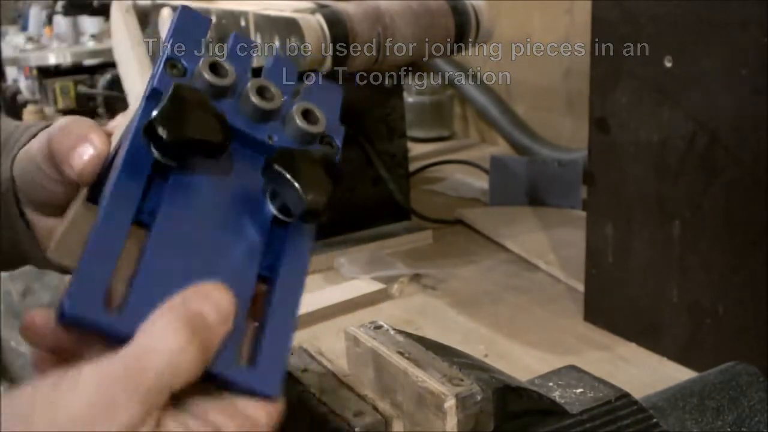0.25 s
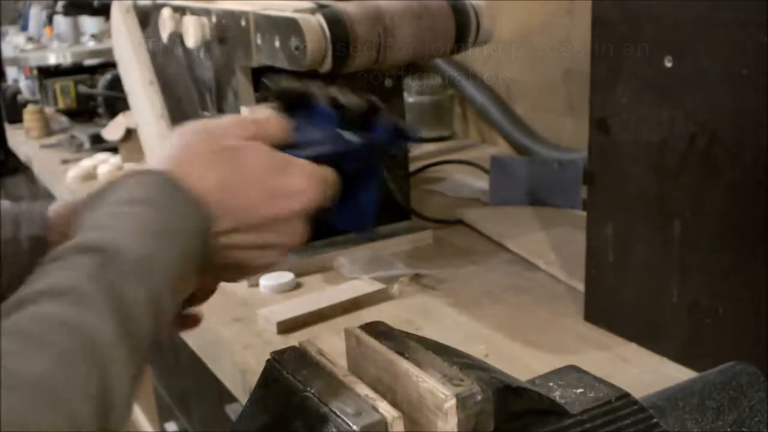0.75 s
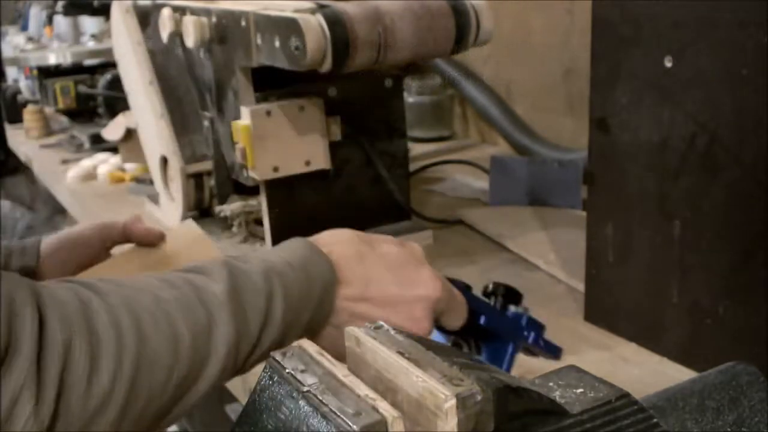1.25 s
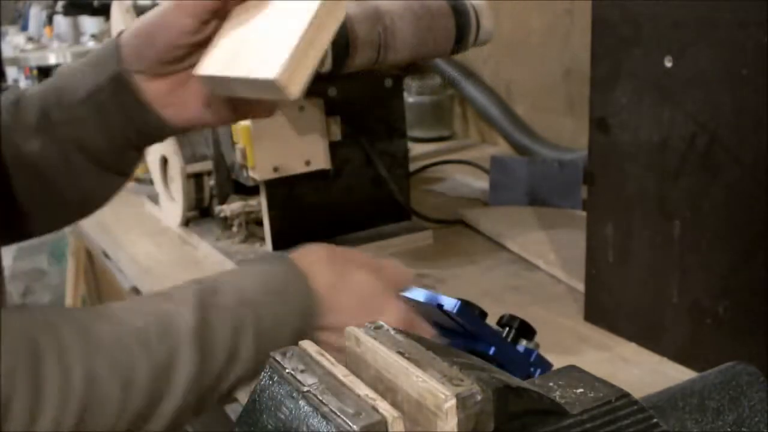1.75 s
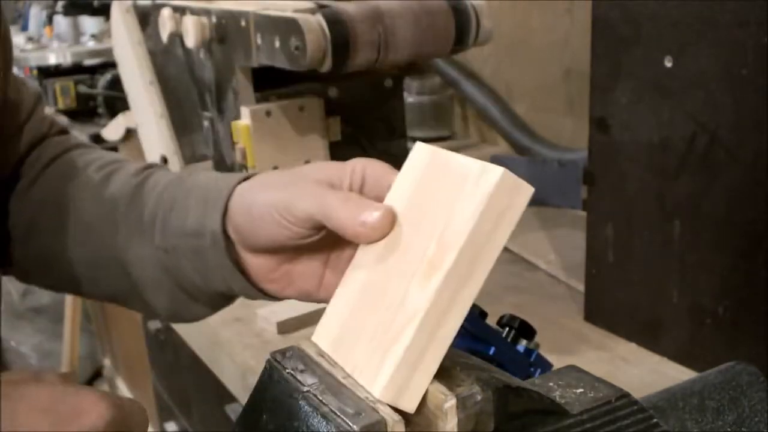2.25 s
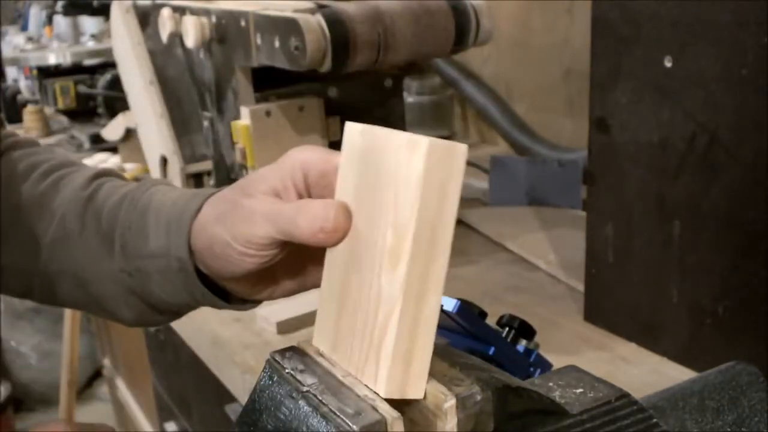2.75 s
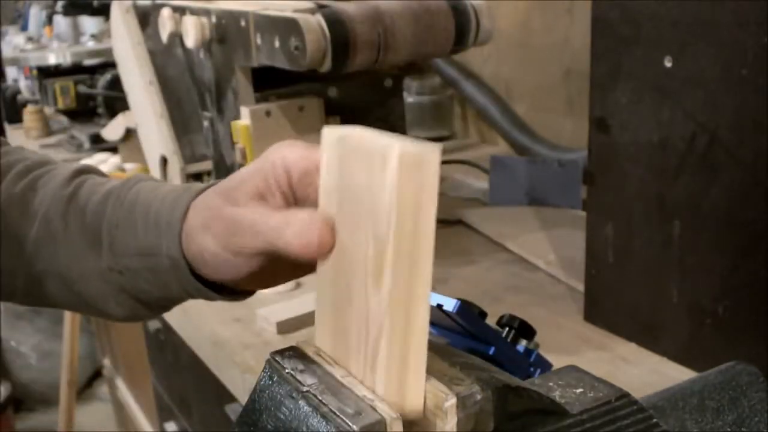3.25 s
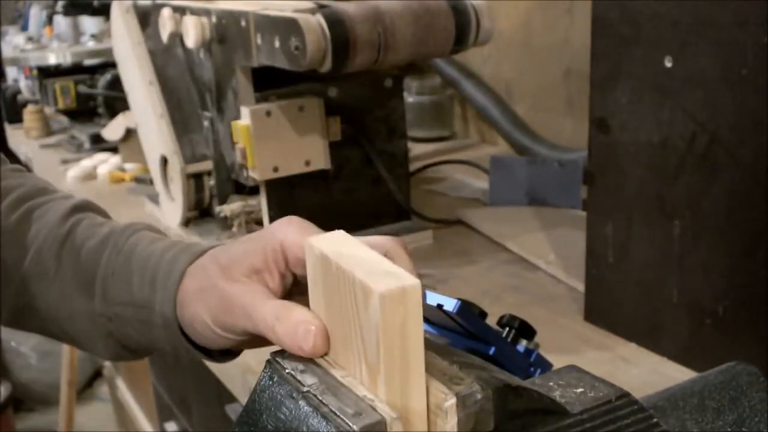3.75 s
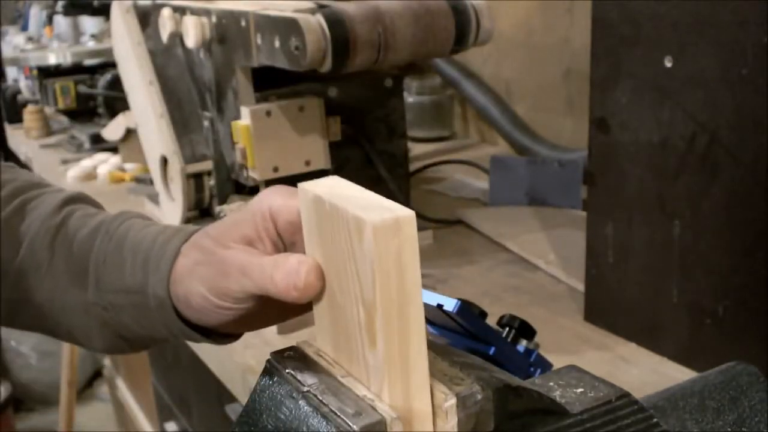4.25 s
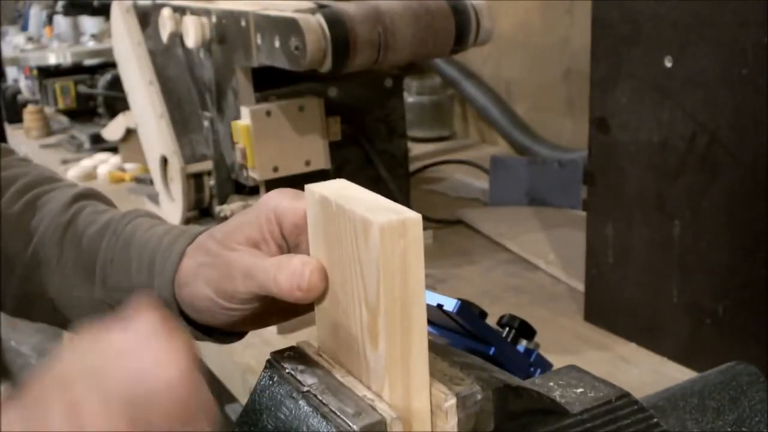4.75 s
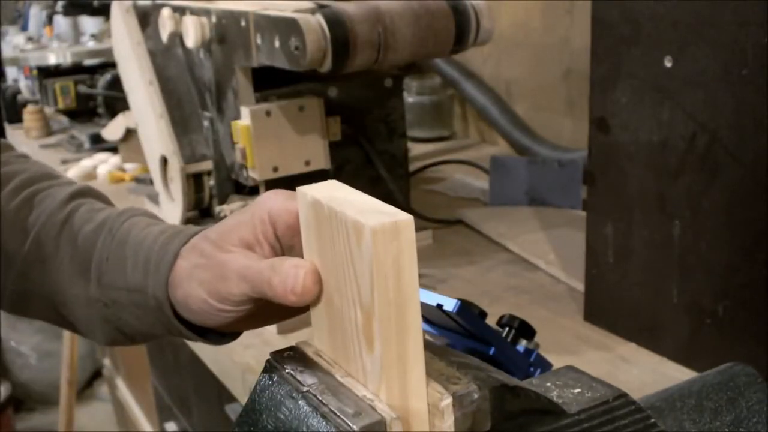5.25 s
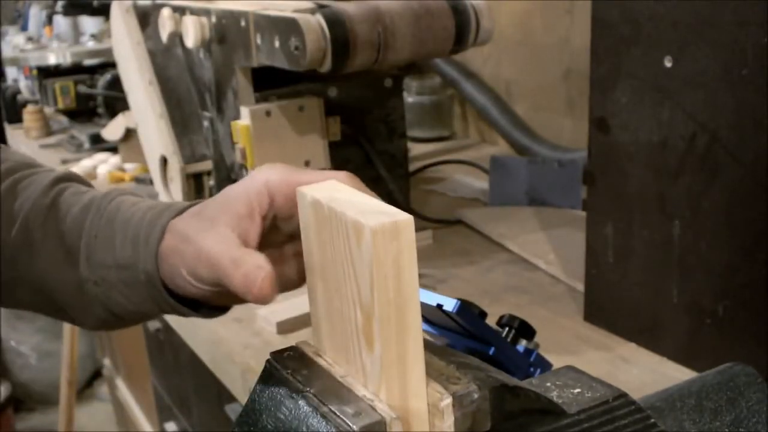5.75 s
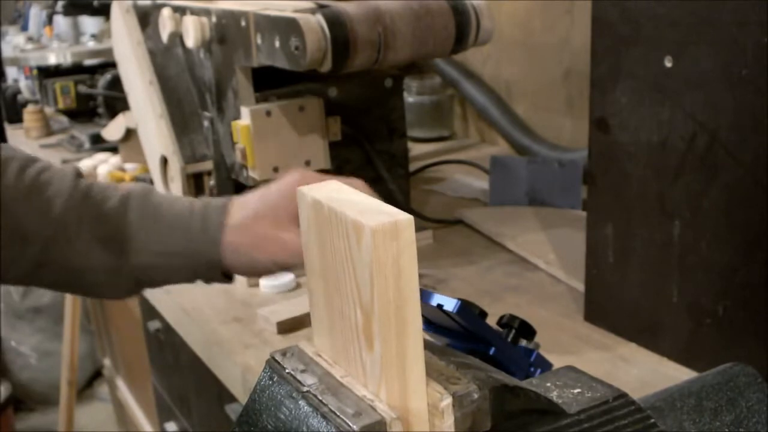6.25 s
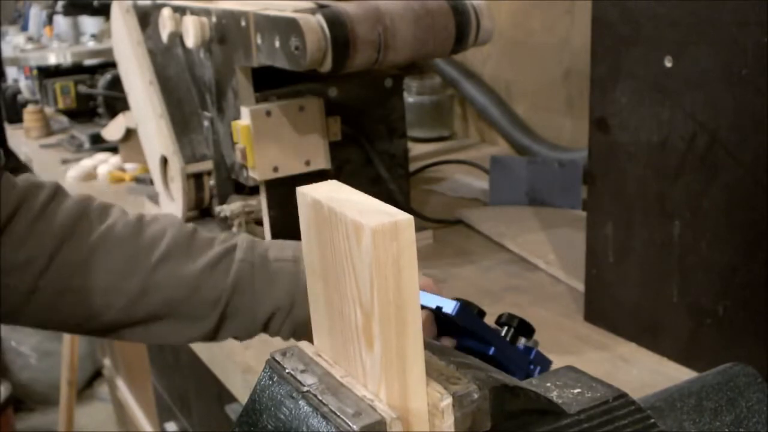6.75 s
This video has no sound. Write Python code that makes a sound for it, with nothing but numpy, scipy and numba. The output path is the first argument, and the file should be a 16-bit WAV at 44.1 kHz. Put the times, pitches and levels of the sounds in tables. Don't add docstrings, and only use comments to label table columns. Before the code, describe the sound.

In a small quiet workshop, a metal jig knocks onto a wooden bench, a pine block taps into a vise, and iron parts clank sharply.

```python
import sys
import numpy as np
from scipy import signal
from scipy.fft import rfft, irfft
from scipy.io import wavfile
from scipy.ndimage import uniform_filter1d
from numba import njit

SR = 44100
rng = np.random.default_rng(int(sys.argv[2]) if len(sys.argv) > 2 else 0)


def volts_from_decibels(level):
    exponent = np.asarray(level, float) / 20
    return 10 ** exponent


def put_to_file(sound):
    columns = np.atleast_2d(sound).T
    safe = np.clip(columns, -1, 1)
    whole_steps = np.round(safe * 32767)
    wavfile.write(sys.argv[1], SR, whole_steps.astype(np.int16))


N = 308700
SPAN = 2 ** 15

# start_s, peak_db, bass_re_peak_db, treble_re_peak_db
BENCH_BLOWS = [
    (1.5405, -21, -13, -27.5),
    (1.571, -7, -31, -32.5),
    (1.5865, -10, -29, -58),
    (1.6, -18, -33, -37),
    (1.62, -23, -21, -24),
    (1.659, -18, -21, -60),
    (1.689, -25.5, -29.5, -52),
    (2.2005, -27.5, -22, -19),
]
BLOCK_BLOWS = [
    (2.57, -40, -9, -11),
    (2.623, -43, 4, 34),
    (3.201, -35.5, -11, -22),
    (4.342, -46, 2, -26),
    (4.709, -50, 0, -17),
    (6.668, -53, 5, -12),
    (6.707, -54, 6, -13),
    (6.784, -37, -3, -3),
]
LIFT_BLOWS = [
    (2.212, -26, -1, 7),
    (2.2175, -21.5, -1, 4),
    (2.227, -29, -11, -11),
    (2.241, -33, -2, -12),
]
EDGE_BLOWS = [
    (3.0595, -25, 9, 0),
    (3.179, -34, 2, -4),
    (3.845, -31.5, -6, 7.5),
]
JAW_BLOWS = [(3.2705, -21, -46, -5.5), (3.297, -23, -24, 6), (3.308, -24.5, -19.5, -7),
             (3.539, -39, -31, 5), (3.563, -21, -51, 7), (3.688, -37, -37, 2), (3.719, -28.5, -30, -9),
             (4.1675, -33.5, -24, -12), (4.218, -38.5, -40, 6), (5.079, -28, -18, -4),
             (6.772, -36.5, -14, -13), (6.79, -35, -21, -10)]
NUT_BLOWS = [
    (5.28, -26, -28, -11),
    (5.3135, -11.5, -26, -2.5),
    (5.494, -29.5, -14.5, -10.5),
]
STOP_BLOWS = [
    (6.3085, -8, 1, 7),
    (6.313, -14.5, -13.5, -7.5),
    (6.319, -15, -33, -19),
]
# start_s, peak_db
THUMPS = [
    (1.414, -33),
    (1.445, -36.5),
    (3.188, -42.5),
    (3.575, -40),
    (4.975, -37),
    (6.108, -31),
    (6.148, -34),
    (6.2, -52),
]
TICKS = [
    (1.458, -41.5),
    (1.513, -35),
    (2.051, -34.5),
    (3.0544, -27),
    (3.167, -36.5),
    (3.25, -28.5),
    (3.4655, -23),
    (6.8595, -32.5),
]
SCREW_BLOWS = [
    (4.966, -9),
]
HANDLE_BLOWS = [
    (6.103, -8),
    (6.1065, -13.5),
]
REBOUNDS = [
    (6.357, -17),
    (6.362, -19),
    (6.369, -17),
    (6.382, -34),
]
PINGS = [
    (6.322, -35.5),
]

# pitch_hz, level_db, t60_s (as heard in the room)
BENCH_MODES = [(324, 11, 0.8), (440, 8.5, 0.16), (554, 5.5, 0.5), (665, 5, 0.8), (837, -3.5, 0.33),
               (1177, -11, 0.45)]
BLOCK_MODES = [(840, 36, 0.024), (970, -20, 0.16), (1003, -8, 0.4), (1930, -3, 0.23), (2740, -21, 0.25)]
LIFT_MODES = [(400, -13, 0.12), (862, -3, 0.18), (1000, -4.5, 0.19), (1215, -3, 0.25), (1760, -5, .28),
              (2210, -3, 0.15), (2800, -11.5, 0.22)]
EDGE_MODES = [(444, -5, 0.21), (900, 5, 0.2), (1390, 0, 0.24), (1980, -11, .2), (2585, -5.5, 0.29),
              (3210, -4, .15)]
JAW_MODES = [(285, -8, 0.27), (413, -11, 0.25), (943, -8, 0.22), (1429, 7.5, 0.25), (1558, 1.5, 0.34),
             (2556, -2, 0.2), (3340, -5, 0.12)]
SCREW_MODES = [(536, -10, 0.19), (690, -18, .3), (872, -9, 0.3), (1270, -11, .3), (1809, 0, 0.19),
               (2660, 9, 0.08), (2800, -18, 0.1), (3321, -10, 0.14), (3780, -0.5, 0.33), (4190, 0.5, 0.37)]
NUT_MODES = [(253, -18, 0.21), (405, -4.5, 0.25), (821, -9, 0.53), (1088, -5, 0.46), (1599, 1.5, 0.33),
             (1880, -19, 0.15), (2145, 3.5, 0.11), (2487, 2, 0.16), (2480, 4, 0.028), (2700, -3.5, 0.11),
             (3735, -4, 0.22)]
HANDLE_MODES = [(294.4, -7.5, 0.21), (426, -5, 0.24), (747, -5, 0.34), (1035, -8, 0.24), (1457, -14, 0.28),
                (1544, -2.5, 0.59), (1622, -1, 0.3), (2124, -21, 0.22), (2780, -3, 0.18), (3220, 2.5, 0.11),
                (4500, -23, .25)]
STOP_MODES = [(372, -4, 0.37), (958, 2.5, 0.29), (1190, 0.5, 0.41), (1500, -4, 0.24), (1690, 12.5, 0.2),
              (2180, -8, .12), (2755, -1, 0.24), (3700, -10, 0.37)]
WASHER_MODES = [(7200, 0, .16)]
SPLIT, SPLIT_HZ, PARTNER_DB = 0.027, 21, -5

# freq_hz, level_db (per Hz)
THUMP_CLACK = [(60, -4.5), (150, 4), (250, -6.5), (450, -20), (900, -48), (16000, -90)]
BENCH_CLACK = [(41, -54), (70, -26), (329, -1), (658, -8.5), (1020, -19.5), (1150, -18.5), (1350, -31),
               (1700, -21), (2690, -35.5), (8000, -66), (10400, -57), (17600, -120)]
BLOCK_CLACK = [(59, -39), (100, -47), (315, 14), (621, 2), (930, -14), (1580, -3.5), (2690, -16),
               (4980, -24), (5900, -25), (16000, -41)]
LIFT_CLACK = [(100, -35), (350, -14), (900, -5), (1800, 1.5), (2800, -7.5), (4500, -17.5), (8000, -24.5),
              (16000, -39)]
EDGE_CLACK = [(100, -37), (400, -3.5), (900, 7), (1500, -2), (2600, -8), (3500, -9.5), (4500, -32),
              (16000, -45)]
TICK_CLACK = [(180, -49), (300, -39), (2740, -2), (3520, 1.5), (5080, -7.5), (5800, -2.5), (13800, -10.5),
              (16000, -71)]
JAW_CLACK = [(59, -53), (100, -28), (381, -20), (1060, -9.5), (1230, -15), (1480, -5.5), (2040, -27),
             (2420, -11.5), (16000, -51.5)]
SCREW_CLACK = [(59, -47), (100, -28.5), (700, -10.5), (1900, -14.5), (2600, -1), (3300, -16), (4380, -7),
               (5300, -21.5), (7600, -18.5), (16000, -60)]
NUT_CLACK = [(80, -24), (350, -8), (700, -18.5), (1300, -12.5), (2000, -3.5), (2550, -8), (3100, -12.5),
             (7000, -25.5), (16000, -51)]
HANDLE_CLACK = [(41, -80), (70, -17), (441, -10), (1340, -9), (1510, -0.5), (1980, -4.5), (2500, -5),
                (3200, -1.5), (4500, -3.5), (9700, -16), (13600, -24), (16000, -50)]
STOP_CLACK = [(60, -41), (376, -13), (700, -10), (1200, -0.5), (1600, 1.5), (2300, 1.5), (3800, -5.5),
              (7400, -20), (11000, -41.5), (16000, -71)]
REBOUND_CLACK = [(59, -48), (100, 4), (1200, -7), (1350, -24), (1690, 1), (2800, -8), (7420, -40),
                 (12000, -36), (15600, -86), (22000, -120)]
# freq_hz, level_db
NEAR_TONE = [(150, -6), (900, 1)]

# loudest_s, swell_s, fade_s, hiss_db, pressure_db
FINGERS = [(0.484, 0.18, 0.02, -60, -13), (1.012, 0.25, 0.087, -83, 9), (1.31, 0.07, 0.08, -54.5, -26),
           (1.66, 0.13, 0.12, -60, 19), (1.874, 0.15, 0.054, -55.5, -6), (2.04, 0.091, 0.11, -54, -25),
           (2.496, .16, 0.095, -47, -18), (2.562, 0.024, .04, -71, -11), (2.634, 0.1, 0.039, -48, -8.5),
           (2.744, 0.11, 0.098, -58.5, -23), (3.03, 0.19, 0.025, -57, -7), (6.79, 0.066, 0.14, -59.5, 11),
           (.24, 1, 0.17, -59, -13)]
SLIDES = [(3.072, 0.0066, 0.073, -47.5, -4.5), (3.163, 0.0045, 0.082, -48.5, -28),
          (3.252, 0.017, 0.095, -41, -54), (3.311, 0.039, 0.0086, -43, 8.5),
          (3.43, 0.074, 0.094, -56.5, 0.5), (3.54, 0.055, 0.046, -43.5, -14.5),
          (3.565, 0.04, 0.018, -39, -16), (3.59, 0.02, 0.07, -55, -7), (3.69, 0.031, 0.083, -51, -12),
          (3.72, 0.033, 0.018, -40.5, -12.5), (3.93, 0.033, 0.37, -54.5, -54),
          (4.01, 0.11, 0.062, -47, -10), (4.1, 0.21, 0.23, -69, 6.5), (4.17, 0.092, 0.35, -62, 5),
          (4.448, 0.019, 0.053, -58.5, -21), (4.638, 0.077, 0.085, -70, -15),
          (4.716, 0.031, 0.18, -81.5, 23), (4.93, 0.17, 0.026, -60.5, -40)]
SLEEVE = [
    (.23, 0.11, 0.12, -59, -13),
    (.455, .05, 0.048, -60.5, -20),
    (1.28, 0.013, .14, -55, -22),
    (1.315, 0.067, 0.066, -69, -20),
    (1.67, 0.11, .06, -55, -20),
    (1.8, .06, 0.088, -58.5, -18),
    (2.06, .06, 0.062, -53.5, -28),
    (3.97, 0.071, 0.23, -55, -16),
]
STROKE_DB = 20
KNOCK_PER_PRESSURE = 0.23
# freq_hz, level_db (per Hz)
SKIN = [(710, -85), (1200, -25), (1830, -12), (2000, -21), (2380, -7), (3220, -10.5), (3510, -9.5),
        (4450, -4), (5130, -12), (13500, -24.5), (16000, -58)]
GRAIN = [(1180, -66), (2000, -52), (2220, -17), (2490, -7), (2910, -12), (3310, -2), (3940, -9),
         (7570, -15.5), (8630, -21.5), (12400, -22.5), (16000, -35)]
CLOTH = [(1500, -30), (3500, -25), (4700, 8), (6000, -4), (10000, -4), (14000, -4), (16000, -16)]
WOOD = [(350, -71), (600, -10), (1020, 4.5), (1100, 3.5), (1560, 9), (1790, 5), (2120, -2), (2460, -6),
        (2600, 2), (3380, -73), (5720, -120)]
RUMBLE = [(90, -6), (200, -2), (400, 11), (700, -5.5), (1000, -23.5)]

# freq_hz, t60_s
ROOM_T60 = [(100, 0.35), (300, 0.28), (1000, 0.34), (3000, 0.3), (8000, 0.29), (15000, 0.19)]
# freq_hz, side_re_mid_db
ROOM_SIDE = [(100, -27), (400, -15), (1000, -6), (3000, -3.5), (8000, 3.5)]
# freq_hz, level_db
ROOM_TONE = [(100, 3), (500, 8.5), (2000, 1), (6000, -6.5), (15000, -7.5)]
# freq_hz, lead_radians
PORT_PHASE = [(500, 0.15), (2000, 1.1), (4000, 1.54), (8000, 1.28), (16000, 1.54)]
# freq_hz, left_re_right_db
PORT_SHADE = [(100, 1.5), (500, 2.5), (1200, 0.5), (2500, -0.5), (5000, 2.5), (9000, 5), (14000, 8)]
# freq_hz, level_db (per Hz)
SHOP_MID = [(12, -81), (20, -13.5), (331, 1), (548, -1.5), (686, 2.5), (1140, -6), (2490, -7),
            (3120, -10.5), (5320, -13), (11000, -22.5), (15000, -23.5), (16400, -53)]
SHOP_SIDE = [(12, -47), (20, -13), (230, 0), (596, -0.5), (1170, -3.5), (1680, -3), (3300, -9.5),
             (4630, -8.5), (12700, -22), (15000, -22), (16400, -59)]
SHOP_MID_DB, SHOP_SIDE_DB = -56, -58


def on_log(table, hz):
    f, v = np.transpose(table)
    return np.interp(np.log(np.maximum(hz, 1)), np.log(f), v)


def colour(x, table):
    n = x.shape[-1]
    return irfft(rfft(x) * volts_from_decibels(on_log(table, np.fft.rfftfreq(n, 1 / SR))), n)


def causal(x, table):
    n = len(x)
    cep = irfft(on_log(table, np.fft.rfftfreq(n, 1 / SR)) * np.log(10) / 20, n)
    cep[1:n // 2] *= 2
    cep[n // 2 + 1:] = 0
    return irfft(rfft(x) * np.exp(rfft(cep)), n)


def level(x, db):
    return x * volts_from_decibels(db) / np.sqrt(np.mean(x ** 2))


def peak(x, db):
    return x * volts_from_decibels(db) / abs(x).max()


def pan(db):
    return volts_from_decibels(np.array([[db / 2], [-db / 2]]))


def walk(rate):
    k = int(SR / rate)
    held = np.repeat(rng.standard_normal(N // k + 1), k)
    return 0.6 * uniform_filter1d(uniform_filter1d(held, k), k)[:N]


def ringing(modes, t, ring, loose):
    hz, db, t60 = (c[:, None] for c in np.transpose(modes))
    own_t60 = np.clip(ring * np.minimum(t60, 0.5), 0.004, 1)
    spot_level, spot_phase = rng.standard_normal((2, len(modes), 1))
    steps = uniform_filter1d(rng.standard_normal((2, len(modes), len(t))), size=48)
    drift = np.cumsum(steps, axis=2) * np.sqrt(2 * np.pi * abs(loose) * hz / SR)
    partner_hz = hz + np.minimum(SPLIT * hz, SPLIT_HZ) * (1 + abs(spot_phase))
    pair = np.sin(2 * np.pi * (hz * t + spot_phase) + drift[0])
    pair += volts_from_decibels(PARTNER_DB) * np.cos(2 * np.pi * partner_hz * t + drift[1])
    return np.sum(volts_from_decibels(db + 2.0 * spot_level - 60 * t / own_t60) * pair, axis=0)


def blows(table, modes, clack, echo, low_hz, high_hz, ring, crack_s, ring_db, wet_db, pan_db, loose):
    out = np.zeros((2, N + SPAN))
    t = np.arange(SPAN // 4) / SR
    rows = np.pad(table, ((0, 0), (0, 4 - len(table[0]))))
    usual = np.median(rows, axis=0)
    push = np.sqrt(t / crack_s) * np.exp(-t / crack_s)
    even = causal((t == 0) * np.sqrt(np.sum(push ** 2)), clack)
    for start_s, peak_db, bass_db, treble_db in rows:
        clatter = causal(rng.standard_normal(len(t)) * push, clack)
        body = ringing(modes, t, ring, loose)
        body = peak(body * (1 - np.exp(-t / crack_s)), ring_db)
        tilt = [(low_hz / 2, bass_db - usual[2]), (low_hz, 0),
                (high_hz, 0), (2 * high_hz, treble_db - usual[3])]
        near, far = (causal(body + v / abs(clatter).max(), tilt) for v in (clatter, even))
        wet = signal.fftconvolve(echo, far[None], axes=1)[:, :SPAN]
        sound = wet * pan(0.64 * pan_db) * volts_from_decibels(wet_db)
        sound[:, :len(t)] += pan(pan_db) * causal(near, NEAR_TONE)
        i = int(start_s * SR)
        out[:, i:i + SPAN] += volts_from_decibels(peak_db) * sound / abs(near).max()
    return out[:, :N]


def jig_on_bench(echo):
    out = blows(THUMPS, BENCH_MODES, THUMP_CLACK, echo, 150, 300, ring=0.1, crack_s=0.011,
                ring_db=-25, wet_db=-8, pan_db=-4, loose=0.05)
    out += blows(BENCH_BLOWS, BENCH_MODES, BENCH_CLACK, echo, 575, 1420, ring=0.095, crack_s=0.0022,
                 ring_db=-4.5, wet_db=-4.5, pan_db=-6.0, loose=0.02)
    return out


def pine_block(echo):
    out = blows(BLOCK_BLOWS, BLOCK_MODES, BLOCK_CLACK, echo, 510, 1400, ring=0.27, crack_s=0.013,
                ring_db=-2.5, wet_db=-3.5, pan_db=-4.5, loose=0.08)
    out += blows(LIFT_BLOWS, LIFT_MODES, LIFT_CLACK, echo, 600, 1900, ring=0.2, crack_s=0.0016,
                 ring_db=-0.5, wet_db=-1.5, pan_db=-5.5, loose=0.05)
    out += blows(EDGE_BLOWS, EDGE_MODES, EDGE_CLACK, echo, 560, 1150, ring=0.23, crack_s=0.0023,
                 ring_db=-2, wet_db=-7, pan_db=-5.5, loose=0.089)
    out += blows(TICKS, BLOCK_MODES, TICK_CLACK, echo, 2800, 5300, ring=0.079, crack_s=0.00062,
                 ring_db=-39, wet_db=1.5, pan_db=-7.5, loose=0.05)
    return out


def vise_jaws(echo):
    return blows(JAW_BLOWS, JAW_MODES, JAW_CLACK, echo, 550, 1680, ring=0.28, crack_s=0.0033,
                 ring_db=-2.5, wet_db=-3.5, pan_db=-6.0, loose=0.042)


def screw_and_nut(echo):
    out = blows(SCREW_BLOWS, SCREW_MODES, SCREW_CLACK, echo, 600, 3000, ring=0.5, crack_s=0.00088,
                ring_db=-10.5, wet_db=-4.0, pan_db=-8.0, loose=0.038)
    out += blows(NUT_BLOWS, NUT_MODES, NUT_CLACK, echo, 460, 2870, ring=0.31, crack_s=0.0015,
                 ring_db=-2.0, wet_db=-0.9, pan_db=-7, loose=0.041)
    return out


def handle_and_stop(echo):
    out = blows(HANDLE_BLOWS, HANDLE_MODES, HANDLE_CLACK, echo, 600, 3000, ring=0.48, crack_s=0.0021,
                ring_db=-13.5, wet_db=4.5, pan_db=-8.5, loose=0.036)
    out += blows(STOP_BLOWS, STOP_MODES, STOP_CLACK, echo, 550, 4500, ring=0.21, crack_s=0.0031,
                 ring_db=-12.0, wet_db=-0.5, pan_db=-7.5, loose=0.03)
    out += blows(REBOUNDS, STOP_MODES, REBOUND_CLACK, echo, 600, 3000, ring=0.19, crack_s=0.0011,
                 ring_db=4.0, wet_db=-8.0, pan_db=-6, loose=0.012)
    out += blows(PINGS, WASHER_MODES, STOP_CLACK, echo, 600, 3000, ring=0.95, crack_s=0.015,
                 ring_db=30, wet_db=-14, pan_db=-4, loose=0.003)
    return out


def rubbing(strokes, surface, echo, rough_db, knock_db, pan_db, wet_db):
    t = np.arange(N) / SR
    gains = np.zeros((3, N))
    for s, swell_s, fade_s, hiss_db, pressure_db in strokes:
        shape = volts_from_decibels(hiss_db - STROKE_DB * np.maximum((s - t) / swell_s, (t - s) / fade_s))
        gains += shape * volts_from_decibels(np.array([[0], [pressure_db], [knock_db + KNOCK_PER_PRESSURE * pressure_db]]))
    size = np.minimum(rng.exponential(size=N), 5)
    catches = rng.standard_normal(N) * volts_from_decibels(rough_db * size + 4.5 * walk(150))
    layers = zip(gains, (surface, RUMBLE, WOOD))
    rub = sum(gain * level(colour(catches, table), 0) for gain, table in layers)
    wet = signal.fftconvolve(echo, rub[None], axes=1)[:, :N]
    return pan(pan_db) * (volts_from_decibels(1.0) * rub + volts_from_decibels(wet_db) * wet)


def hands_and_sleeve(echo):
    out = rubbing(FINGERS, SKIN, echo, rough_db=3.0, knock_db=-7, pan_db=-7.0, wet_db=-8.0)
    out += rubbing(SLIDES, GRAIN, echo, rough_db=2, knock_db=4, pan_db=-5.5, wet_db=-5.5)
    out += rubbing(SLEEVE, CLOTH, echo, rough_db=5.5, knock_db=-30, pan_db=-5, wet_db=3)
    return out


def room():
    t = np.arange(SPAN) / SR
    mid, side = rng.standard_normal((2, SPAN))
    side = colour(side, ROOM_SIDE)
    spectrum = rfft(np.array([mid + side, mid - side]))
    octaves = np.log2(np.fft.rfftfreq(SPAN, 1 / SR) + 1)
    out = 0
    for octave in np.arange(5, 15, 0.5):
        share = np.clip(1 - 2 * abs(octaves - octave), 0, 1)
        out = out + irfft(spectrum * share, SPAN) * volts_from_decibels(-60 * t / on_log(ROOM_T60, 2 ** octave))
    out = out * (1 - np.exp(-(t / 0.003) ** 2))
    out = out / np.sqrt(np.mean(np.sum(out ** 2, axis=1)))
    return np.array([causal(c, ROOM_TONE) for c in out])


def ports(x):
    hz = np.fft.rfftfreq(N, 1 / SR)
    half = volts_from_decibels(on_log(PORT_SHADE, hz) / 2) * np.exp(0.5j * on_log(PORT_PHASE, hz))
    return irfft(rfft(x) * np.array([half, 1 / half]), N)


def shop():
    mid = level(colour(rng.standard_normal(N), SHOP_MID), SHOP_MID_DB) * volts_from_decibels(0.2 * walk(1.21))
    side = level(colour(rng.standard_normal(N), SHOP_SIDE), SHOP_SIDE_DB) * volts_from_decibels(1.0 * walk(4.86))
    return pan(-1.2) * np.array([mid + side, mid - side])


def scene():
    echo = room()
    out = jig_on_bench(echo)
    out += pine_block(echo)
    out += vise_jaws(echo)
    out += screw_and_nut(echo)
    out += handle_and_stop(echo)
    out += hands_and_sleeve(echo)
    low_cut = signal.butter(3, 85, "high", fs=SR, output="sos")
    return ports(signal.sosfilt(low_cut, out)) + shop()


@njit
def follow(size, attack, release):
    out, e = np.empty(len(size)), 1e-9
    for i in range(len(size)):
        e += (size[i] - e) * (attack if size[i] > e else release)
        out[i] = e
    return out


def band_limit(x):
    return signal.sosfilt(signal.butter(12, 16500, fs=SR, output="sos"), x)


def record(dry):
    attack_s, release_s, threshold_db = 0.0057, 0.039, -20.5
    loud = follow(abs(dry).max(axis=0), 1 / (attack_s * SR), 1 / (release_s * SR))
    held = dry * np.minimum(volts_from_decibels(threshold_db) / loud, 1) ** 0.55
    top_cut = signal.ellip(8, 0.2, 70, 16200, fs=SR, output="sos")
    return band_limit(signal.sosfilt(top_cut, held))


dry = scene()
out = record(dry)
put_to_file(out)
```